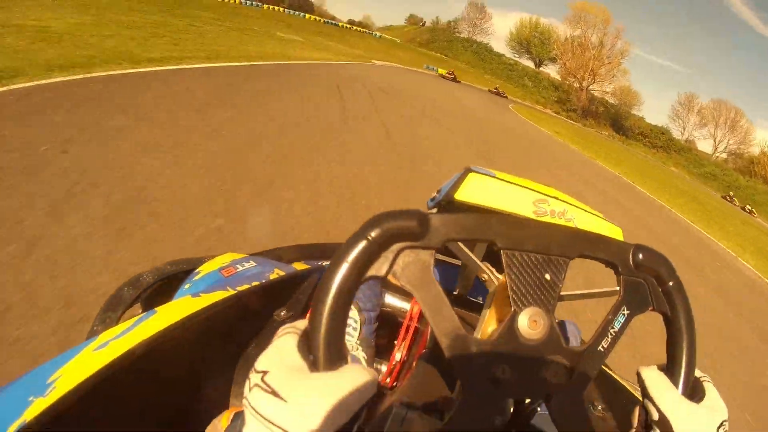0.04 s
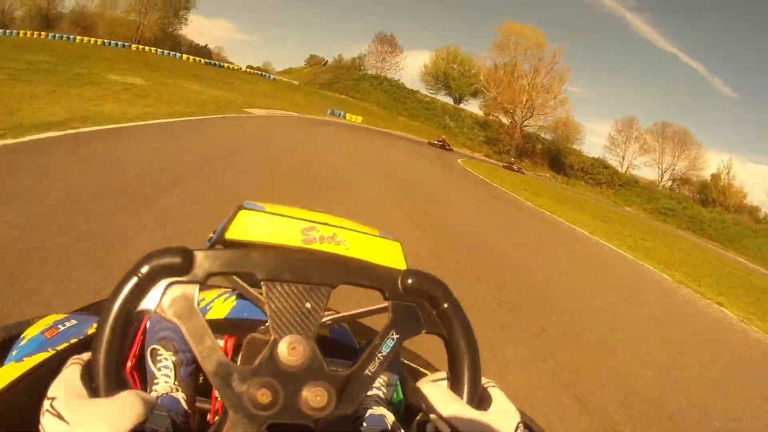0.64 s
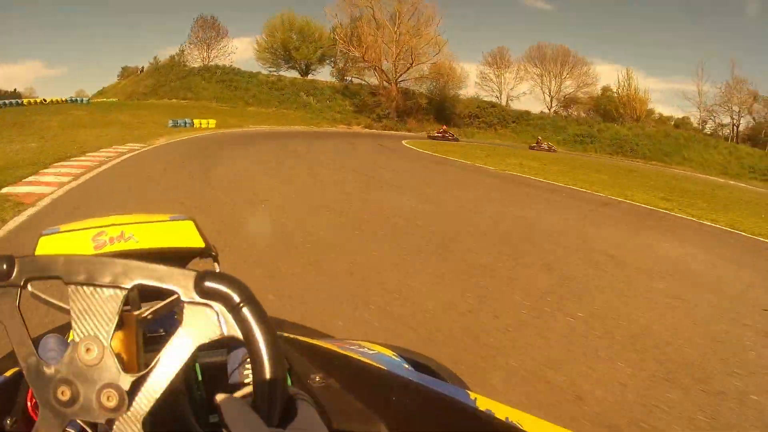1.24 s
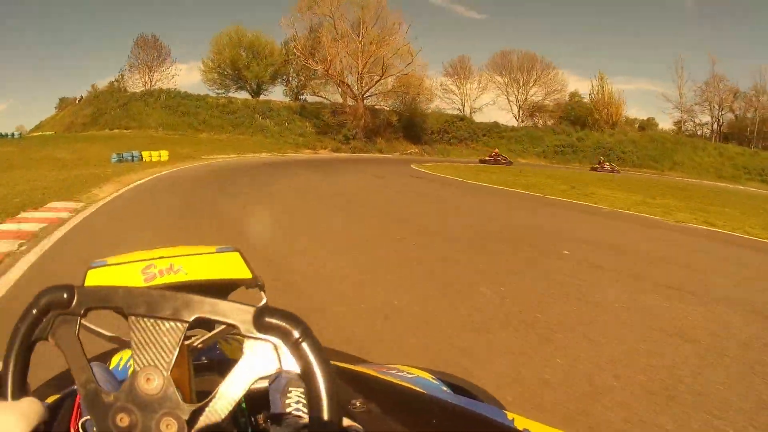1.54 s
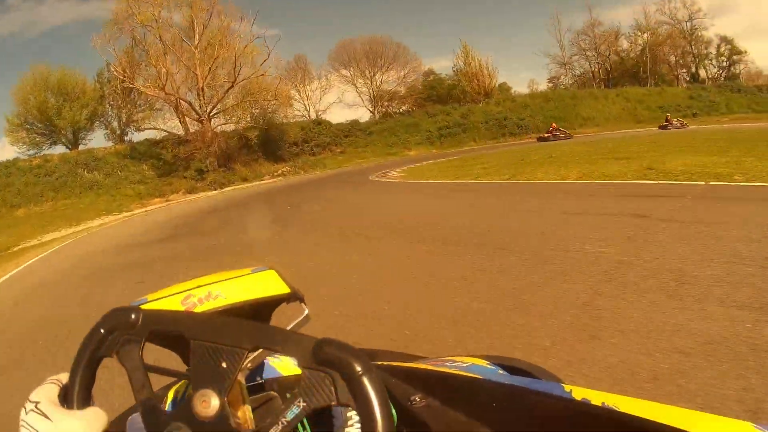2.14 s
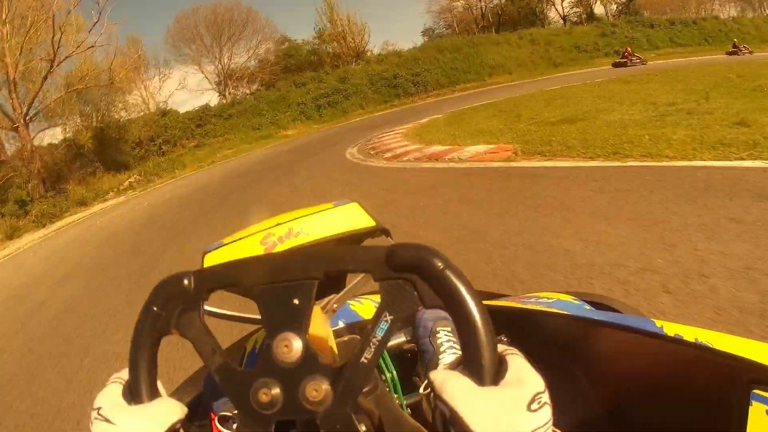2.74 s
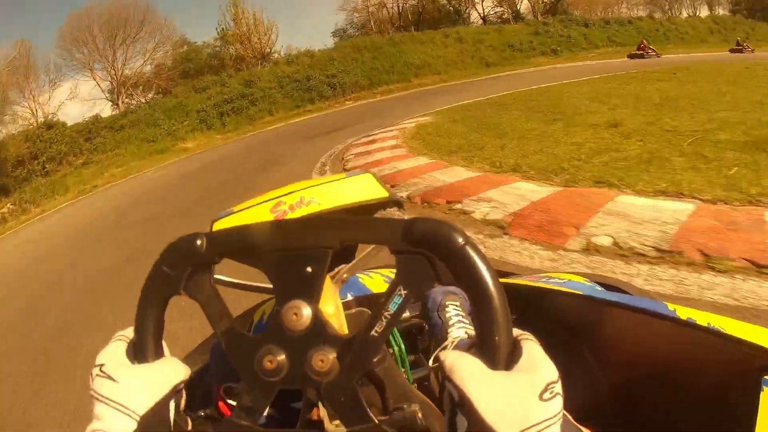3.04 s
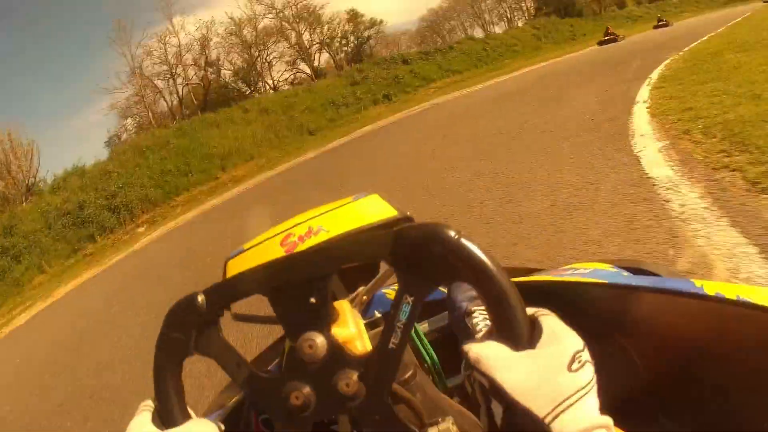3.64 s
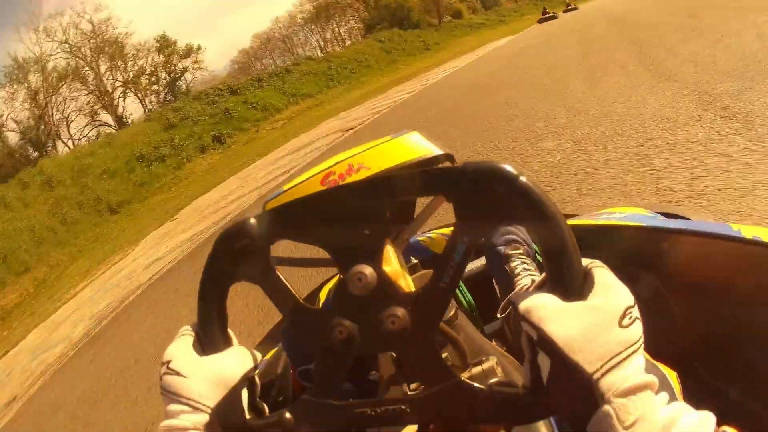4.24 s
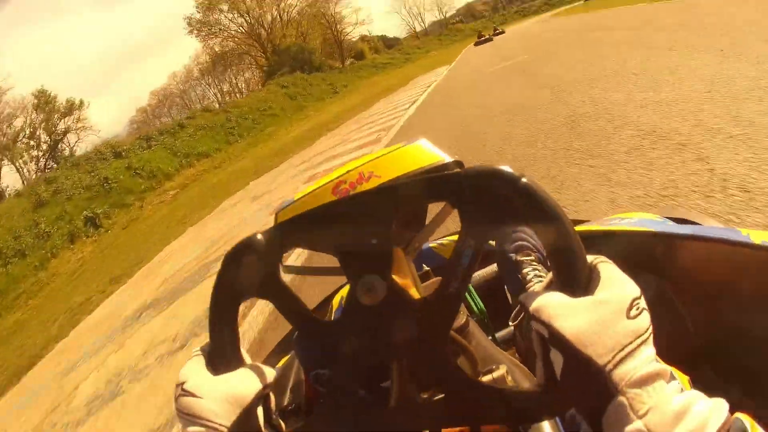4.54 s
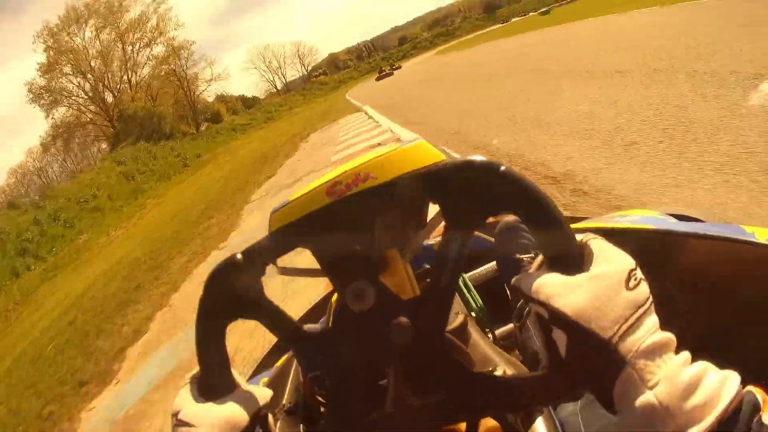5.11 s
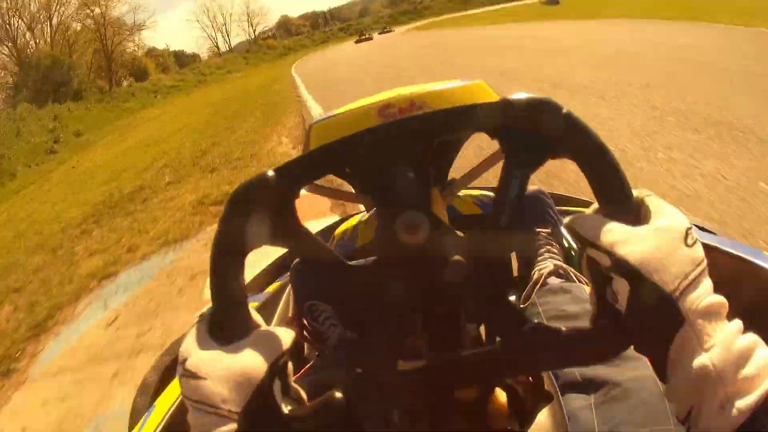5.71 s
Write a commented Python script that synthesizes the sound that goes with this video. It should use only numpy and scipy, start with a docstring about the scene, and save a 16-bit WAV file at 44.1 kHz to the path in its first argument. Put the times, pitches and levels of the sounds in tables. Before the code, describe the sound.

Over buffeting wind and tyre rumble, a racing kart's engine eases for a corner, the bodywork knocks hard, and the engine drones on, whining.

```python
"""On a kart track, riding a four-stroke kart: the engine runs fast, sags off the throttle into a corner,
then pulls and picks up. The exhaust puffs with each burn, the drive whines with the crank, the frame
shakes with every firing, and chain and fittings rattle to the right. Wind buffets the camera housing,
tyres rumble on the asphalt and fling up grit, and bumps knock the bodywork and its steel brackets,
once hard."""
import sys
import numpy as np
from scipy import signal
from scipy.fft import rfft, irfft
from scipy.io import wavfile
from scipy.ndimage import map_coordinates

SR = 44100
rng = np.random.default_rng(int(sys.argv[2]) if len(sys.argv) > 2 else 0)


def materialize(psi):
    """Save the field psi as 16-bit PCM at rate SR to the path in sys.argv[1].

    A 1-D psi becomes a single channel; in a 2-D psi each row is a channel.
    """
    bounded = np.clip(np.atleast_2d(psi).T, -1, 1)
    quanta = np.round(bounded * 32767).astype(np.int16)
    wavfile.write(sys.argv[1], SR, quanta)


N = 263277
T = np.arange(N) / SR
HZ = np.fft.rfftfreq(N, 1 / SR)


def amp(db):
    """Decibels to gain."""
    return 10 ** (np.asarray(db) / 20)


def unit_rms(x):
    """Scales to rms 1."""
    return x / np.sqrt(np.mean(x ** 2) + 1e-20)


def curve(points, hz):
    """Reads a table on a log-frequency axis."""
    f, value = np.transpose(points)
    return np.interp(np.log(hz + 1), np.log(f + 1), value)


def eq(x, points):
    """Filters x with an EQ table."""
    return irfft(rfft(x) * amp(curve(points, np.fft.rfftfreq(len(x), 1 / SR))), len(x))


def automation(points):
    """Reads a time table at every sample."""
    return np.interp(T, *np.transpose(points))


def ramp(start_s, length_s):
    """Rises from 0 to 1."""
    return np.clip((T - start_s) / length_s, 0, 1)


def wander(hz):
    """Smooth random drift of rms 1, up to about hz."""
    slow = map_coordinates(rng.standard_normal(4096), [T[::32] * 2 * hz], order=3, mode="wrap")
    return unit_rms(np.interp(T, T[::32], slow))


def grains(per_s, spread_db):
    """Two random trains of clicks of uneven size."""
    sizes = amp(spread_db * np.minimum(rng.exponential(1, (2, N)), 5)) * rng.choice([-1, 1], (2, N))
    return unit_rms(sizes * (rng.random((2, N)) < per_s / SR))


# How alike the two microphone ports sound. Each row: frequency in Hz, likeness from 0 to 1.
PORT_LIKENESS = [(60, .988), (180, .984), (300, .965), (520, .92), (900, .75), (1500, .4), (2600, .4)]
# Phase between the ports. Each row: frequency in Hz, lead of the left in radians.
PORT_LEAD = [(20, 0), (200, 0.17), (600, 0.33), (860, 1.36), (1150, 0.86), (1600, 2.04), (2600, 0)]
# Balance between the ports. Each row: frequency in Hz, left minus right in dB.
PORT_BALANCE = [(60, 0), (340, .5), (610, 1.2), (820, 3.2), (1090, 4), (1460, 0), (2000, -3)]
def ports(x, other=None):
    """Places a sound at the two microphone ports; a diffuse one is partly different on the right."""
    left = right = rfft(x)
    if other is not None:
        likeness = np.clip(curve(PORT_LIKENESS, HZ), 0, 1)
        right = likeness * left + np.sqrt(1 - likeness ** 2) * rfft(other)
    pan = amp(curve(PORT_BALANCE, HZ) / 2) * np.exp(.5j * curve(PORT_LEAD, HZ))
    return irfft(np.array([left * pan, right / pan]), N)


# The shadow of the housing. Each row: frequency in Hz, left port against right in dB.
HOUSING_SHADOW = [(700, 0.5), (1700, 0), (3000, -7), (5000, -12), (9000, -12), (15000, -11)]
def far_port(x, lag_s=0.00017):
    """A sound from the right reaches the left port late and shaded."""
    samples = np.arange(len(x))
    return eq(np.interp(samples - np.round(lag_s * SR), samples, x), HOUSING_SHADOW)


# The engine's revs. Each row: time in seconds, firings per second.
FIRING_RATE = [(0, 37.89), (0.45, 37.89), (1.1, 38.53), (1.4, 36.8), (1.75, 32.83), (2.0, 32.3),
               (2.3, 30.33), (2.55, 29.78), (3.3, 29.38), (3.6, 29.64), (3.8, 29.32), (4.9, 29.47),
               (5.4, 30.07), (5.97, 31.34)]
def pace(corner_hz=29.5, straight_hz=38.5):
    """About 0 at corner speed, about 1 on the straight."""
    return (automation(FIRING_RATE) - corner_hz) / (straight_hz - corner_hz)


def coasting(lift_s=1.006, open_s=2.39):
    """0 under power, 1 while the driver lifts for the corner."""
    return ramp(lift_s, 0.19) - ramp(open_s, 0.21)


# Kerbs at the apex and the exit. Each row: start in seconds, end in seconds, roughness as a factor.
KERBS = [(3.205, 3.74, 0.8), (4.743, 6.0, 1.04)]
def kerb(fade_s=0.055):
    """0 on smooth asphalt, about 1 on a kerb."""
    return sum(rough * (ramp(start, fade_s) - ramp(end, fade_s)) for start, end, rough in KERBS)


def fader(corner_db, fast_db, coast_db, kerb_db):
    """Gain of a layer: its level in the corner, plus what speed, a shut throttle and a kerb add."""
    return amp(corner_db + fast_db * pace() + coast_db * coasting() + kerb_db * kerb())


# The exhaust note. Each row: multiple of the firing rate, relative dB running fast, relative dB pulling.
EXHAUST_ORDERS = [(1, -9, -12.5), (2, 2, -1), (3, -1, -6), (4, -8.5, -7.5), (5, -3, -9), (6, -5.5, -0.5),
                  (7, -9.5, -8), (8, -9, -13.5), (9, -15, -11.5), (10, -12, -12.5), (11, -15.5, -25.5),
                  (12, -31.5, -15.5), (13, -29, -11), (14, -22.5, -14), (15, -44.5, -19), (16, -27.5, -22)]
def exhaust(cycles, rough=0.18, waver_hz=12, fast_share=0.85, scatter=0.54):
    """Low orders add up to one puff per burn; their balance shifts with speed, the upper waver most."""
    fast = np.clip(fast_share * pace(), 0, 1)
    burn, out = 1 + rough * wander(waver_hz), np.zeros(N)
    for k, fast_db, pull_db in EXHAUST_ORDERS:
        stray = rough * k / 5 * (wander(waver_hz) + 1j * wander(waver_hz))
        partial = (burn + stray) * np.exp(2j * np.pi * (k * cycles + scatter * rng.random()))
        out += amp(fast * fast_db + (1 - fast) * pull_db) * partial.real
    return ports(np.sqrt(2) * out * fader(corner_db=-22, fast_db=2.5, coast_db=-13.5, kerb_db=0.7))


# The bassy chug of the pipe. Each row: frequency in Hz, EQ gain in dB.
BURBLE_EQ = [(20, -13), (60, 10.5), (95, -3.5), (140, -0.5), (230, -8.5), (330, -12), (700, -37),
             (3000, -120)]
def burble(cycles, coast_db=-20, power_db=-31.5, uneven=0.62):
    """Strong and weak burns alternate unevenly, so the exhaust chugs, above all on the overrun."""
    strength = np.cos(np.pi * np.floor(cycles)) + uneven * rng.uniform(-1.2, 2.1, N)
    firings = np.diff(np.floor(cycles), prepend=0) * strength
    return ports(unit_rms(eq(firings, BURBLE_EQ)) * amp(power_db + (coast_db - power_db) * coasting()))


# A kerb throws the chain slack for a moment. Each row: centre in seconds, length in seconds.
CHAIN_SLACKS = [(3.33, 0.035), (3.74, 0.03), (4.81, 0.04), (5.315, 0.04)]
def chain_tension(taut_s=2.66, bite=0.26, settle_s=0.25, loose_s=5.42):
    """The chain bites and settles, slackens briefly on kerbs, then shakes loose on the long exit kerb."""
    taut = ramp(taut_s, 0.033) * (1 + bite * np.exp(-np.maximum(T - taut_s, 0) / settle_s))
    slack = sum(np.exp(-(2 * (T - s) / length) ** 4) for s, length in CHAIN_SLACKS)
    return taut * (1 - .5 * slack) * (1 - .7 * ramp(loose_s, .04))


# The drive's whine and its crank sidebands. Each row: multiple of the firing rate, relative level in dB.
WHINE_ORDERS = [(24, -9), (26, -6), (27, -14), (28, 0), (29, -15), (30, -11.5), (33, -15), (36, -19),
                (42, -15), (56, -18.5)]
# Chirps as the chain snatches tight. Each row: centre in seconds, level in dB, length in seconds.
CHAIN_SNATCHES = [(1.854, -23, 0.043), (2.54, -23, 0.059), (2.679, -19.5, 0.028), (4.872, -38, 0.036),
                  (5.386, -32.5, 0.04)]
def whine(cycles, mesh_order=28, guard_hz=829, guard_width_hz=46, guard_db=11.5, flutter_hz=34):
    """Teeth mesh 14 times a crank turn; a taut chain rings its guard; kerbs deepen the flutter."""
    # Play in the drive wobbles the phase.
    lash = (.52 - .22 * pace() + .8 * kerb()) * wander(9)
    lash += (.35 - .18 * pace() + .1 * coasting()) * wander(28)
    level = fader(corner_db=-35.5, fast_db=3.9, coast_db=-6 + 4 * pace(), kerb_db=0)
    chirps = sum(amp(db) * np.exp(-(2 * (T - s) / length) ** 2) for s, db, length in CHAIN_SNATCHES)
    rate, tension, out = automation(FIRING_RATE), chain_tension(), np.zeros(N)
    for k, db in WHINE_ORDERS:
        detune = 2 * (k * rate - guard_hz) / guard_width_hz
        gain = amp(db + guard_db * tension / (1 + detune ** 4)) * level
        phase = 2 * np.pi * (k * cycles + rng.random()) + k / mesh_order * lash
        out += (gain + chirps * (k == mesh_order)) * np.cos(phase)
    flutter = 1 + (.25 + .08 * kerb()) * wander(flutter_hz)
    return ports(np.sqrt(2) * out * flutter)


# The low-mid body of the chassis, for frame and tyres. Each row: frequency in Hz, EQ gain in dB.
CHASSIS_EQ = [(40, -71), (110, -21), (250, -0.5), (420, 1), (580, -3), (720, -6.5), (900, -6),
              (1100, -16.5), (1450, -20.5), (2000, -22), (3000, -36.5), (6000, -65), (12000, -100)]
def frame(cycles, ring_t60=0.023, flex_hz=3, limp=0.47):
    """Each firing and, more weakly, the idle crank turn between ring the frame and panels."""
    hits = np.flatnonzero(np.diff(np.floor(2 * cycles)))
    blows = np.zeros(N)
    blows[hits] = np.resize([1, .6], len(hits)) * rng.uniform(.4, 1.6, N)[:len(hits)]
    blows *= 1 + limp * coasting() * np.cos(np.pi * np.floor(cycles))  # overrun: every other one is weak
    t, flex, pair = T[:4096], wander(flex_hz), []
    crossfade = np.array([np.cos(flex), np.sin(flex)])  # flexing panels drift between two rings
    for rings in rng.standard_normal((2, 2, len(t))) * amp(-60 * t / ring_t60):
        shaken = signal.oaconvolve(blows * crossfade, rings, axes=1).sum(0)
        pair.append(unit_rms(eq(shaken[:N], CHASSIS_EQ)))
    return ports(*pair) * fader(corner_db=-33.5, fast_db=3, coast_db=-2.5, kerb_db=1)


def tyres(lump_db=1, lump_hz=25):
    """Coarse asphalt shakes the unsprung chassis."""
    pair = [unit_rms(eq(x, CHASSIS_EQ)) for x in rng.standard_normal((2, N))]
    lumps = amp(lump_db * wander(lump_hz))
    return ports(*pair) * fader(corner_db=-24, fast_db=3, coast_db=1.06, kerb_db=2) * lumps


# The rattle, duller on the left and brighter on the right. Each row: frequency in Hz, EQ gain in dB.
RATTLE_LEFT_EQ = [(500, -17), (1400, 6.5), (1850, -10.5), (2250, 7), (3100, -7), (4000, -9), (5000, -18.5),
                  (6200, -14), (8000, -22), (11000, -30), (15800, -31.5)]
RATTLE_RIGHT_EQ = [(500, -18.5), (1300, 7), (1750, 9), (2150, 2.5), (2700, 2), (3300, 2), (3750, -1.5),
                   (4400, -2.5), (5300, -8), (6300, -10.5), (7200, -11), (8500, -13.5), (11000, -20.5),
                   (15800, -34)]
def rattle(cycles, throb=0.087, hiss=0.58, shake_db=1, shake_hz=35, bleed=0.28):
    """Chain rollers and loose fittings tick densely, throbbing with the crank, mostly on the right."""
    ticks = grains(per_s=3500, spread_db=0.5) + hiss * rng.standard_normal((2, N))
    left, right = ticks * (1 + throb * np.cos(4 * np.pi * cycles)) * amp(shake_db * wander(shake_hz))
    pair = np.array([eq(left + bleed * far_port(right), RATTLE_LEFT_EQ), eq(right, RATTLE_RIGHT_EQ)])
    return unit_rms(pair) * fader(corner_db=-43, fast_db=4, coast_db=-1, kerb_db=0.5)


# The sub-heavy buffeting. Each row: frequency in Hz, EQ gain in dB.
WIND_EQ = [(3, -1), (12, 1.5), (28, 1.5), (50, -6), (80, -13), (140, -16), (250, -24), (600, -100),
           (3000, -120)]
# The wind eases through the corner. Each row: time in seconds, relative level in dB.
WIND_LEVELS = [(0, -13.5), (1.7, -13), (2.3, -15), (2.8, -18.5), (4.7, -21.5), (5.3, -16.5), (5.6, -14),
               (5.97, -13)]
def wind(trim_db=3, gust_db=1.34, gust_hz=4):
    """Eddies press on the camera housing."""
    pair = [unit_rms(eq(x, WIND_EQ)) for x in rng.standard_normal((2, N))]
    return ports(*pair) * amp(automation(WIND_LEVELS) + trim_db + gust_db * wander(gust_hz))


# The crisp top of grit and stones on the bodywork. Each row: frequency in Hz, EQ gain in dB.
GRIT_EQ = [(2500, -30), (5000, -4), (7500, 3), (9500, 0), (11000, -5), (12500, -2), (15800, -7)]
def grit(clump_db=2.5, clump_hz=30):
    """Grit thrown up by the tyres patters on the bodywork in clumps, most at speed and on the kerbs."""
    near, spill = grains(per_s=1500, spread_db=-3) * amp(clump_db * wander(clump_hz))
    pair = np.array([far_port(eq((near + spill) / np.sqrt(2), GRIT_EQ)), eq(near, GRIT_EQ)])
    return unit_rms(pair) * fader(corner_db=-69.5, fast_db=12.5, coast_db=1, kerb_db=9)


# The floor tray, then a steel fitting. Each row: pitch in Hz, width in Hz, level in dB,
# change on a kerb in dB, left minus right in dB.
FITTING_MODES = [(375.4, 113, -33.5, 6.5, 0), (1205, 110, -45.5, -0.5, 5.5)]
def fittings():
    """Road shake keeps the floor tray and a steel fitting ringing; the tray swells on the kerbs."""
    out = np.zeros((2, N))
    for hz, width, db, kerb_db, pan_db in FITTING_MODES:
        resonance = 1 / (1 + 2j * (HZ - hz) / width) ** 2
        pair = [unit_rms(irfft(rfft(x) * resonance, N)) for x in rng.standard_normal((2, N))]
        out += ports(*pair) * amp(db + kerb_db * kerb() + np.array([[pan_db], [-pan_db]]) / 2)
    return out


# The ring of the steel brackets. Each row: pitch in Hz, relative level when struck in dB,
# level when shaken in the corner in dB, change at speed in dB.
BRACKET_MODES = [(2170, 2, -56, 9), (3090, 1, -61, 4), (4400, -1, -57, -1), (4970, -2, -66, 3),
                 (5680, -11, -65, 0), (7400, -12, -71, 6), (8250, -16, -77, 12), (9450, -17, -75, 8),
                 (12300, -22, -75, 0)]
def jingle(sharpness=9, swell_db=2.3, swell_hz=9, left_db=-5):
    """Road shake keeps the brackets chattering; each mode swells and fades as the contacts shift."""
    out = np.zeros((2, N))
    for hz, _, corner_db, fast_db in BRACKET_MODES:
        resonance = 1 / (1 + 2j * (HZ / hz - 1) * sharpness) ** 2
        ring = irfft(rfft(rng.standard_normal((2, N))) * resonance, N)
        chatter = unit_rms(ring * amp(swell_db * wander(swell_hz)))
        out += chatter * fader(corner_db, fast_db, coast_db=-4, kerb_db=2)
    return out * amp([[left_db], [0]])


# The knock of the bodywork. Each row: frequency in Hz, EQ gain in dB.
KNOCK_EQ = [(60, -10), (200, 2), (550, 5), (850, 5.5), (1200, 0), (1800, -2), (2170, 2), (2500, -5.5),
            (3050, 0), (3550, -7), (4000, -13), (4400, -6), (4700, -11), (4980, -6.5), (5500, -15),
            (6200, -19), (7300, -17.5), (9400, -18.5), (10200, -25), (12000, -24), (14000, -30),
            (15800, -29)]
# Bumps in the track. Each row: start in seconds, level in dB, seconds to die away by 60 dB.
BUMPS = [(0.335, -41, .15), (0.636, -37, .04), (0.68, -45, .15), (1.7329, -12.5, 0.1),
         (1.739, -11.5, 0.065), (1.96, -43, 0.13), (2.575, -46, .1), (3.283, -38.5, 0.22),
         (3.318, -42, 0.15), (3.605, -40, 0.11), (4.0, -41, 0.071), (4.823, -39, 0.087), (5.062, -38, 0.14),
         (5.13, -42, .13), (5.618, -45, .06), (5.752, -39, 0.07), (5.895, -38, .07)]
def bumps(bright_db_per_octave=5, attack_s=.0005):
    """A bump sets the plastic bodywork chattering on the right; light bumps are mostly tick."""
    out, t = np.zeros((2, N + 8192)), T[:8192]
    for start, db, t60 in BUMPS:
        lightness = np.clip((-25 - db) / 10, 0, 1)
        tone = [(hz, gain + lightness * bright_db_per_octave * np.log2(hz / 1000))
                for hz, gain in KNOCK_EQ]
        near, spill = (unit_rms(eq(x, tone)) for x in rng.standard_normal((2, len(t))))
        chatter = np.array([far_port((near + spill) / np.sqrt(2)), near])
        envelope = amp(db - 60 * t / t60) * (1 - np.exp(-t / attack_s))
        out[:, round(start * SR):][:, :len(t)] += chatter * envelope
    return out[:, :N]


def clang(trim_db=-12.5, t60=0.034, left_db=-11, spread=.017):
    """Every bump also strikes the steel brackets, whose modes lie in close clusters and clank briefly."""
    out, t = np.zeros((2, N + 8192)), T[:8192]
    for start, db, _ in BUMPS:
        ring = sum(amp(struck_db) * np.sin(2 * np.pi * (hz * detune * t + rng.random((2, 1))))
                   for hz, struck_db, _, _ in BRACKET_MODES
                   for detune in 1 + rng.uniform(-spread, spread, size=3))
        out[:, round(start * SR):][:, :len(t)] += ring / np.sqrt(3) * amp(db + trim_db - 60 * t / t60)
    return out[:, :N] * amp([[left_db], [0]])


# The off-throttle hum. Each row: multiple of the firing rate, relative level in dB.
OVERRUN_ORDERS = [(4, -4), (6, -2.5), (8, -0.5), (10, -3.5), (12, -4.5), (14, -1.5), (16, -4)]
def overrun(cycles, level_db=-35, rough=0.5, waver_hz=10):
    """With the throttle shut, the unbalanced crank hums through the frame, gliding down with the revs."""
    out = np.zeros(N)
    for k, db in OVERRUN_ORDERS:
        stray = rough * (wander(waver_hz) + 1j * wander(waver_hz))
        out += amp(db) * ((1 + stray) * np.exp(2j * np.pi * (k * cycles + rng.random()))).real
    return ports(np.sqrt(2) * out * amp(level_db) * coasting())


# Thuds and pings. Each row: start in seconds, level in dB, pitch in Hz, seconds to die away by 60 dB.
JOLTS = [(1.727, -2.5, 156, 0.057), (1.7376, -9, 570, 0.053), (2.252, -6.5, 155, 0.088),
         (2.441, -24.5, 1222, 0.12), (3.281, -11.5, 370, 0.2), (5.759, -16, 1510, 0.02)]
def jolts(attack_s=0.00061):
    """Each jolt sets one part of the chassis ringing in a single mode that dies away."""
    out = np.zeros(N)
    for start, db, hz, t60 in JOLTS:
        t = np.maximum(T - start, 0)
        out += amp(db - 60 * t / t60) * (1 - np.exp(-t / attack_s)) * np.sin(2 * np.pi * hz * t)
    return ports(out)


# Single stone hits. Each row: start in seconds, level in dB.
STONES = [(2.594, -49), (2.69, -47), (5.329, -38), (5.34, -46), (5.388, -43), (5.3945, -45), (5.402, -47)]
def stones(t60=0.02):
    """Small stones flung up by the tyres click on the bodywork, to the right."""
    out, t = np.zeros(N + 4096), T[:4096]
    for start, db in STONES:
        click = unit_rms(eq(rng.standard_normal(len(t)), GRIT_EQ)) * amp(db - 60 * t / t60)
        out[round(start * SR):][:len(t)] += click
    return np.array([far_port(out[:N]), out[:N]])


def scene():
    """One crank drives all the engine layers, over a bed of tyres and wind, with road hits on top."""
    rate = automation(FIRING_RATE) * (1 + .002 * wander(10))
    cycles = np.cumsum(rate) / SR  # one cycle is one firing, two crank turns
    engine = exhaust(cycles) + burble(cycles) + overrun(cycles)
    machinery = whine(cycles) + frame(cycles) + rattle(cycles)
    road = tyres() + wind() + grit() + stones()
    chassis = fittings() + jingle() + bumps() + clang() + jolts()
    return engine + machinery + road + chassis


def record(dry, ceiling=.97, top_hz=15850):
    """Both inputs sit off centre, so the deepest wind swings flatten and clip; then the top is cut."""
    lows = signal.sosfiltfilt(signal.butter(2, 1200, fs=SR, output="sos"), dry)
    off_centre = lows + np.array([[-.29], [-.05]])
    saturated = off_centre / (1 + (off_centre / ceiling) ** 12) ** (1 / 12)
    clipped = np.clip(saturated + dry - lows, -.99, .99)
    high_cut = signal.firwin(511, top_hz, window=("kaiser", 9), fs=SR)
    return signal.oaconvolve(clipped, high_cut[None], "same")


dry = scene()
out = record(dry)
materialize(out)
```